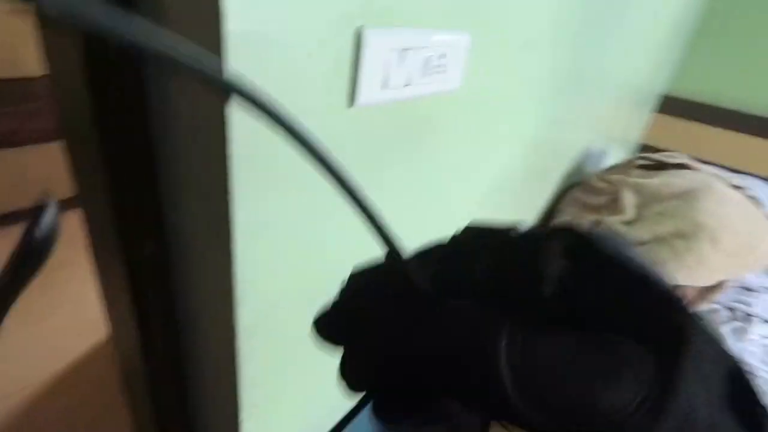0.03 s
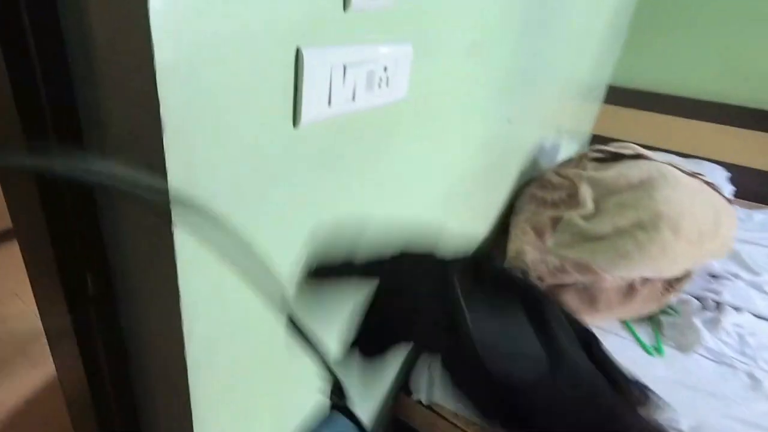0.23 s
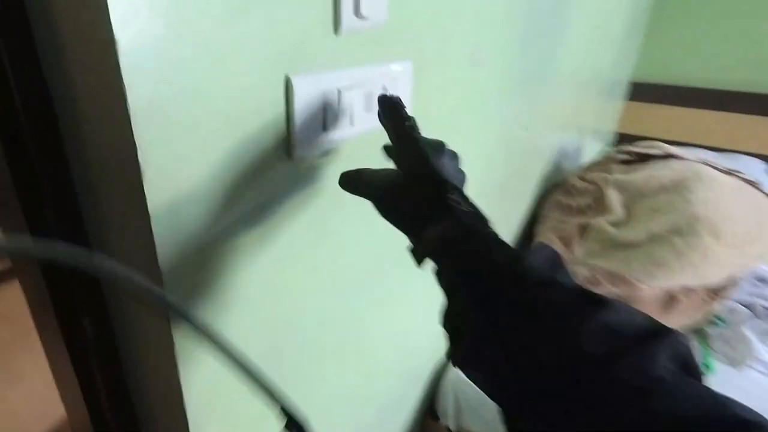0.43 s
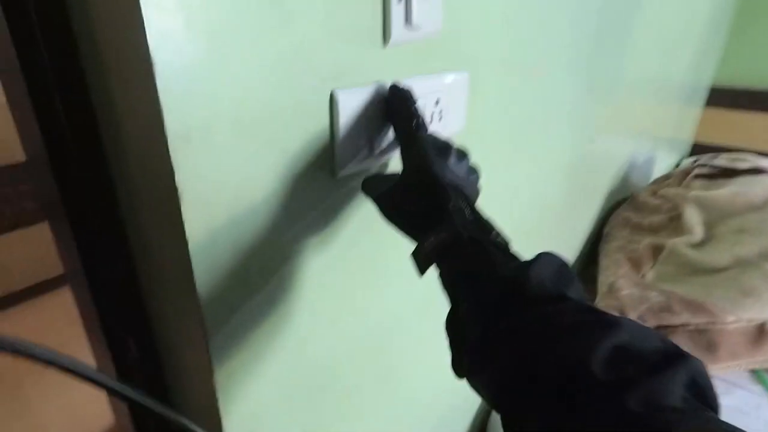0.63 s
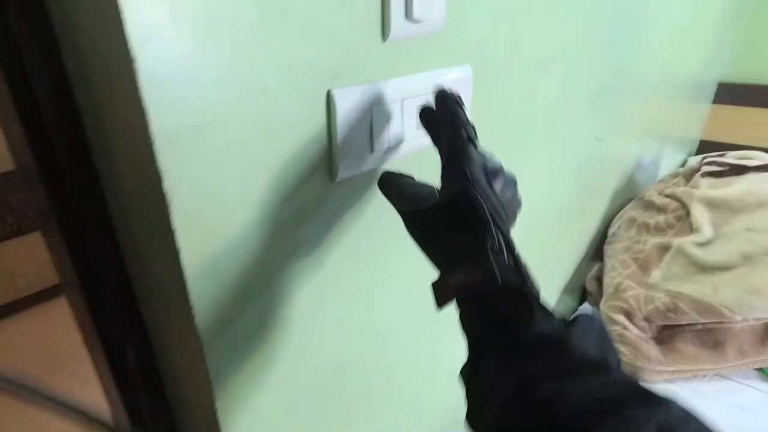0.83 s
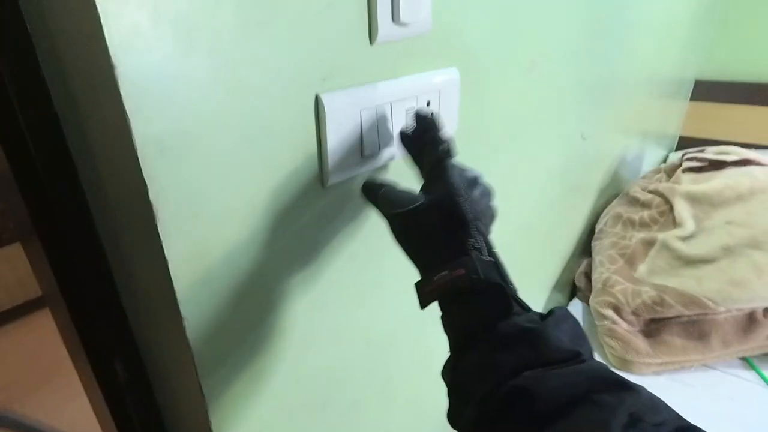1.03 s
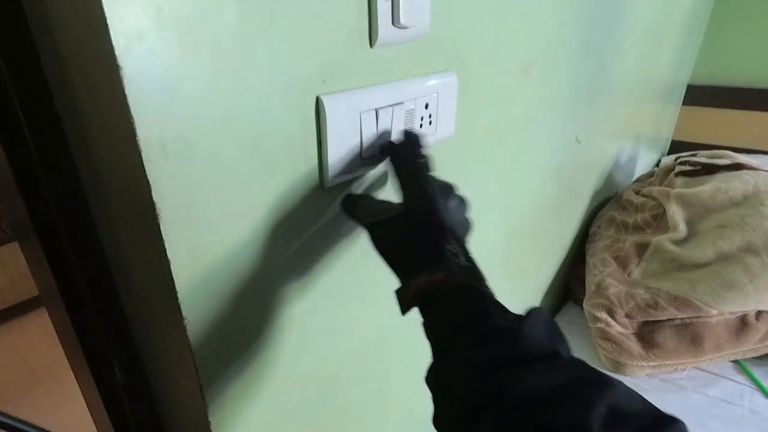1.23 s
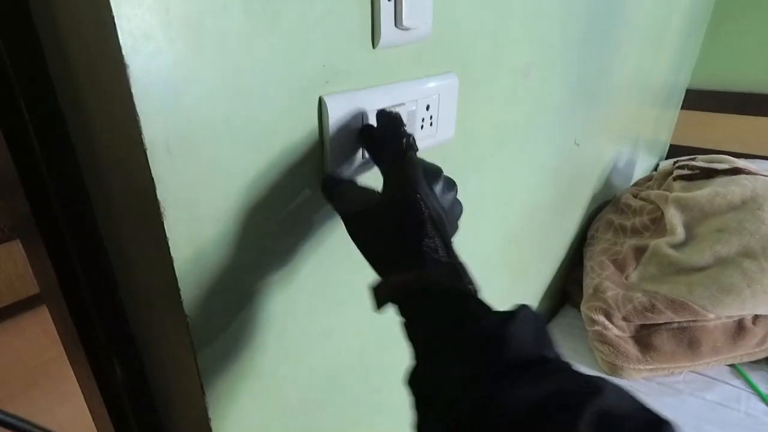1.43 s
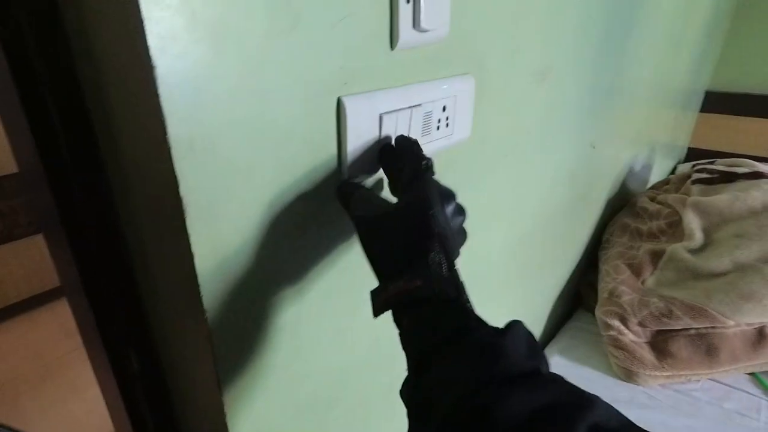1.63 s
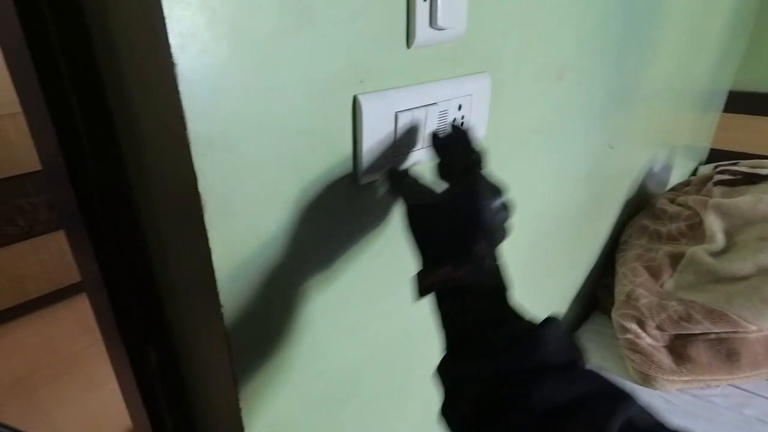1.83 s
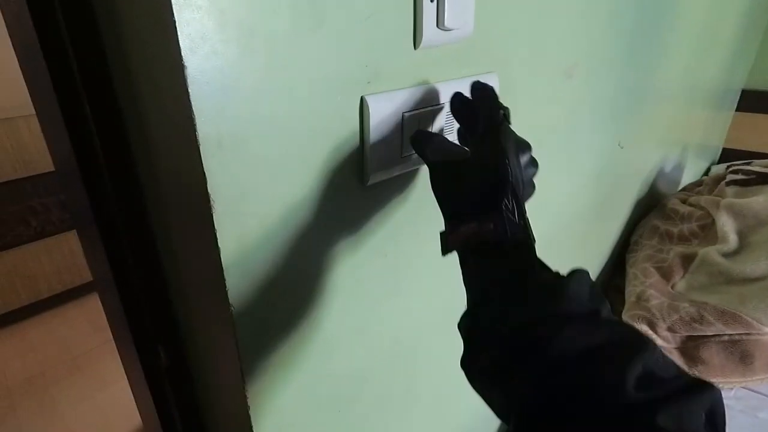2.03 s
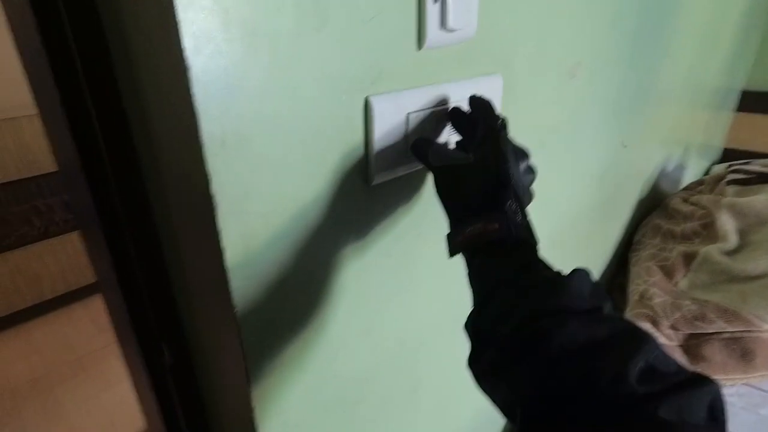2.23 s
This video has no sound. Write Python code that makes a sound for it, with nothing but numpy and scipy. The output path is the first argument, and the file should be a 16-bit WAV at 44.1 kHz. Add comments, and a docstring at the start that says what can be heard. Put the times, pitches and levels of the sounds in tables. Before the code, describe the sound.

Plastic wall switches click sharply three times, at about 0.7, 1.2 and 1.8 seconds, the second a little louder, each with a brief ring and short small-room tail. Faint sleeve rustle opens the sound and fades by 1.4 seconds. Light rubbing and soft, hollow knocks on the body-worn microphone come around 0.4, 0.6, 1.1 and 1.6 seconds, over faint steady room tone.

```python
"""Rocker switches in a hotel room

A gloved hand flicks plastic rocker switches on a wall plate three times. Each rocker snaps over,
strikes its stop and rings the plate; the small room answers briefly. The body-worn camera's microphone
picks up close sleeve rustle, and rubs and soft knocks through its hollow mount, over faint room tone."""
import sys
import numpy as np
from scipy import signal
from scipy.fft import rfft, irfft
from scipy.io import wavfile
from scipy.ndimage import uniform_filter1d

SR = 44100
rng = np.random.default_rng(int(sys.argv[2]) if len(sys.argv) > 2 else 0)


def unload_wav(signal):
    """Save mono or channel-first audio to the path in sys.argv[1] as 16-bit WAV at rate SR, clipped to [-1, 1]."""
    wavfile.write(
        sys.argv[1],
        SR,
        np.round(np.clip(np.atleast_2d(signal).T, -1, 1) * 32767).astype(np.int16),
    )


N = 100459

# flicks of the rockers: start_s, level_db, ring_build_s, bounce_delay_s, bounce_db
FLICKS = [(0.719, -23.5, 0.00088, 0.0022, -7.5), (1.2442, -20, 0.0038, .0048, 1.5),
          (1.7800, -22, 0.00094, 0.0019, -1)]
# stereo image of sounds right at the microphone: frequency_hz, left_right_likeness
CLOSE_LIKENESS = [(100, 1), (900, 0.99), (2000, 0.72), (4000, .1)]


def switches():
    """Each rocker cracks against its stop, bounces once and rings the plate; gives rings and cracks."""
    # modes of the wall plate: pitch_hz, t60_s, first_flick_db, second_flick_db, third_flick_db
    plate_modes = [(818, 0.085, -18.5, -46, -14), (1072, 0.037, -4, -19, -17),
                   (1154, 0.079, -15.5, -21, -18), (1255, 0.031, -8, -21, -11),
                   (1617, 0.016, -8, -15, -16.5), (2082, 0.027, -14, -24, -9),
                   (2355, 0.025, -12, -4.5, -18), (2673, 0.023, -7.5, -10, -12),
                   (2910, 0.021, -12, 2.5, -3), (3175, 0.034, -9, -23, -3), (3512, 0.036, -11.5, -10, -14),
                   (3750, 0.028, -20, -5, -9), (3920, 0.015, -36, -22, -18), (4830, 0.02, -4.5, -5, -19),
                   (5070, 0.032, -34, -7, -14), (5210, 0.022, -34, -10, -12),
                   (6360, 0.036, -18.5, -14, -17)]
    # the plate at the two microphone ports: frequency_hz, left_minus_right_db, left_lead_rad
    ports = [(980, 1.5, 0), (2300, -9, -1), (2600, -13, -0.3), (2840, -8, 1), (3180, -3, 0.9),
             (3440, 5, 2.5), (3700, -9, -3.5), (4770, -10.5, -4.5), (6240, 0, -3.5)]
    # spectrum of a dry contact: frequency_hz, level_db
    crack_colour = [(200, -18), (800, -8), (1500, 2), (3300, 8), (4400, -3.5), (5300, -6), (6000, -15),
                    (7600, -13), (9500, -18), (15000, -13)]
    crack_db, crack_t60_s, crack_rise_s = -10.5, 0.029, 0.000092
    low_build_s, low_below_hz = 0.0015, 1400  # the low modes swell more slowly
    rings, cracks = np.zeros((2, N)), np.zeros((2, N))
    t = np.arange(SR // 8) / SR
    side = np.array([[.5], [-.5]])
    for flick, (start_s, flick_db, build_s, bounce_s, bounce_db) in enumerate(FLICKS):
        for k, (hz, t60, *mode_db) in enumerate(plate_modes):
            swell = 1 - np.exp(-t / (build_s + low_build_s * (hz < low_below_hz)))
            wave = (-1) ** k * np.sin(2 * np.pi * hz * t + side * at_hz(ports, hz, column=2))
            gain = amp(flick_db + mode_db[flick] + side * at_hz(ports, hz))
            add(rings, start_s, gain * swell * fade(t, t60) * wave)
        for delay_s, contact_db in [(0, 0), (bounce_s, bounce_db)]:
            burst = noise(crack_colour, likeness=[(1, 0.68)], size=len(t))
            crack = burst * fade(t, crack_t60_s) * (1 - np.exp(-t / crack_rise_s))
            add(cracks, start_s + delay_s, amp(flick_db + contact_db + crack_db) * crack)
    return rings, cracks


def room_reflections(rings, cracks):
    """Each flick scatters into a short tail; its low ring lingers and echoes once off the far wall."""
    # decay of the room: frequency_hz, t60_s
    decay = [(200, 0), (1000, 0.46), (3000, 0.33), (6000, 0.27), (14000, 0.46)]
    # spectrum of a flick's tail: frequency_hz, level_db
    tail_colour = [(200, -9), (800, -5), (1150, -2), (1450, -6), (2050, -6), (2400, 3), (3000, 1.5),
                   (3800, 0), (4300, -14), (5100, -3), (6000, -15.5), (12000, -29)]
    # stereo image of the tail: frequency_hz, left_right_likeness
    tail_likeness = [(100, 0.53), (1100, 0.99), (2400, 0.56), (5000, 0.13), (15000, 0)]
    tail_delay_s, tail_db, linger_db = .007, -24, -5
    echo_delay_s, echo_db, low_ring_top_hz = .039, -7.5, 1200

    def tail(colour):
        hz, t, bands = signal.stft(noise(colour, tail_likeness, size=SR // 2), SR, nperseg=256)
        return signal.istft(bands * fade(t, at_hz(decay, hz)[:, None]), SR, nperseg=256)[1]

    out = np.zeros((2, N))
    for start_s, flick_db, *_ in FLICKS:
        add(out, start_s + tail_delay_s, amp(flick_db + tail_db) * tail(tail_colour))
    low_ring = signal.lfilter(*signal.butter(4, low_ring_top_hz, fs=SR), rings + cracks)
    walls = tail(colour=[(1, 0)])
    lingering = signal.fftconvolve(low_ring, walls / np.linalg.norm(walls[0]), axes=1)
    add(out, tail_delay_s, amp(linger_db) * lingering)
    add(out, echo_delay_s, amp(echo_db) * low_ring)
    return out


def camera_mount():
    """Rubs and soft knocks reach the microphone through the hollow mount; a firm knock damps its ring."""
    # low modes of the mount: pitch_hz, t60_s, level_db
    low_modes = [(126.3, 0.11, -9), (236.8, 0.056, 2.5), (291.2, 0.039, -1.5), (441, 0.051, -6)]
    # upper modes of the mount: pitch_hz, t60_s, level_db
    upper_modes = [(717, 0.024, 4.5), (849.3, 0.041, 4.5), (1101, 0.037, 0), (1435, 0.025, -4.5)]
    # rubbing on the mount: time_s, low_modes_db, upper_modes_db
    rubbing = [(0, -42, -43), (.07, -46, -55.5), (.2, -54.5, -58), (.27, -52, -58.5), (.34, -52.5, -60),
               (.39, -42, -59.5), (.47, -54, -60.5), (.52, -45.5, -48.5), (.62, -40, -53.5),
               (.71, -42, -58), (.8, -53.5, -61), (.88, -46.5, -56.5), (1.07, -49, -58), (1.12, -49, -48),
               (1.18, -48.5, -57.5), (1.24, -51.5, -57.5), (1.32, -51.5, -58), (1.38, -67, -59),
               (1.58, -63.5, -71), (1.62, -49.5, -54), (1.7, -51.5, -58.5), (1.76, -60, -58.5),
               (2.28, -77, -66)]
    # knocks on the mount: start_s, low_modes_db, upper_modes_db, share_of_free_t60
    knocks = [(.369, -38, -64, 0.7), (.511, -51, -49, 1), (0.5981, -32.5, -62, 0.87),
              (.622, -32, -33.5, 0.73), (0.6762, -37, -71, 1), (1.117, -36.5, -43, 0.72),
              (1.126, -41, -37, 1), (1.6255, -43, -40, .4), (1.6345, -33.5, -35.5, 0.7),
              (1.6382, -41, -50, 0.82)]
    rise_s, low_cut_hz = 0.0024, 82
    t = np.arange(SR // 4) / SR

    def ring(modes, t60_share):
        tones = sum(amp(db) * fade(t, t60 * t60_share) * np.sin(2 * np.pi * hz * t)
                    for hz, t60, db in modes)
        return tones[None] * (1 - np.exp(-t / rise_s))

    out = np.zeros((2, N))
    for column, modes in enumerate([low_modes, upper_modes], 1):
        friction = noise([(1, 0)], CLOSE_LIKENESS) * grain(depth_db=1, length_s=.012)
        rub = signal.fftconvolve(friction, ring(modes, t60_share=0.96), axes=1)[:, :N]
        out += unit(rub) * envelope(rubbing, column)
        for knock in knocks:
            add(out, knock[0], amp(knock[column]) * ring(modes, t60_share=knock[3]))
    return signal.lfilter(*signal.butter(2, low_cut_hz, "high", fs=SR), out)


def body_sway():
    """The wearer's movement puts a low rumble on the microphone."""
    # sway of the body: time_s, level_db
    sway = [(0, -69), (.11, -62), (.19, -67), (.33, -74), (.37, -44), (.44, -52), (.52, -60), (.6, -61),
            (.75, -63), (1.05, -60), (1.3, -71), (1.40, -65), (1.8, -70), (2.28, -72)]
    # spectrum of the rumble: frequency_hz, level_db
    rumble_colour = [(15, -39), (33, -14), (48, -0.5), (62, -12.5), (90, -13.5), (150, -8.5), (400, -62)]
    return noise(rumble_colour, CLOSE_LIKENESS) * envelope(sway)


def sleeve_rustle():
    """Cloth catches and slips close to the microphone."""
    # movement of the sleeve: time_s, level_db
    movement = [(0, -48), (.1, -56.5), (.2, -55), (.35, -56.5), (.5, -59.5), (.62, -56), (.9, -60.5),
                (1.4, -72), (2.28, -92)]
    # spectrum of the cloth: frequency_hz, level_db
    cloth_colour = [(400, -3), (1000, 2), (1400, -1.5), (1700, -12), (1950, -4), (2200, -11), (2600, -6.5),
                    (3400, -6.5), (4300, -15), (8000, -29), (16000, -35)]
    return noise(cloth_colour, CLOSE_LIKENESS) * envelope(movement) * grain(depth_db=1.5, length_s=0.014)


def room_tone():
    """Faint, steady room noise and microphone hiss."""
    # spectrum of the noise floor: frequency_hz, level_db
    floor_colour = [(20, -21), (130, -16.5), (170, -3.5), (260, -4), (330, -3.5), (560, -8.5), (740, -6),
                    (850, -5), (950, -8.5), (1130, -12), (1500, -10.5), (2050, -16), (3000, -13),
                    (4300, -17), (8600, -21), (9600, -17), (10600, -21.5), (13200, -22.5), (14200, -19.5),
                    (15200, -25), (15700, -66)]
    # its stereo image: frequency_hz, left_right_likeness
    floor_likeness = [(60, 0.45), (400, 0.68), (950, 0.87), (2400, 0.13), (6000, 0), (15000, 0.087)]
    return amp(-54.5) * noise(floor_colour, floor_likeness)


def amp(db):
    """Decibels to gain."""
    return 10 ** (np.asarray(db) / 20)


def unit(x):
    """Scales to rms 1."""
    return x / np.sqrt(np.mean(x ** 2) + 1e-20)


def at_hz(points, hz, column=1):
    """Reads one column of a table on a log-frequency axis."""
    columns = np.transpose(points)
    return np.interp(np.log(hz + 1), np.log(columns[0] + 1), columns[column])


def envelope(points, column=1):
    """Gain over time from a dB curve."""
    columns = np.transpose(points)
    return amp(np.interp(np.arange(N) / SR, columns[0], columns[column]))


def add(mix, start_s, sound):
    """Mixes a sound into both channels from start_s on."""
    part = mix[:, max(round(start_s * SR), 0):][:, :sound.shape[1]]
    part += sound[:, :part.shape[1]]


def noise(colour, likeness, size=N):
    """Stereo noise of rms 1 with a spectrum and a left-right likeness; a one-point curve is flat."""
    hz = np.fft.rfftfreq(size, 1 / SR)
    left, independent = rfft(rng.standard_normal((2, size)))
    shared = np.clip(at_hz(likeness, hz), -1, 1)
    right = shared * left + np.sqrt(1 - shared ** 2) * independent
    return unit(irfft(np.array([left, right]) * amp(at_hz(colour, hz)), size))


def fade(t, t60):
    """Exponential decay, 60 dB in t60 seconds."""
    return np.exp(-np.log(1000) * t / np.maximum(t60, 1e-3))


def grain(depth_db, length_s):
    """Random catching and slipping of a rubbed surface, as a gain."""
    roughness = uniform_filter1d(rng.standard_normal(N), max(int(length_s * SR), 2))
    return unit(amp(depth_db * unit(roughness)))


def scene():
    """Switches within arm's reach, the room around them, handling noise and room tone."""
    rings, cracks = switches()
    handling = camera_mount() + body_sway() + sleeve_rustle()
    return rings + cracks + room_reflections(rings, cracks) + handling + room_tone()


def record(dry):
    """The camera rounds off the sharpest peaks and cuts the highest treble."""
    overload_db, top_hz = -19.5, 15700
    rounded = amp(overload_db) * np.tanh(dry / amp(overload_db))
    lowpass = signal.firwin(401, top_hz, window=("kaiser", 9), fs=SR)
    return signal.oaconvolve(rounded, lowpass[None], "same")


dry = scene()
out = record(dry)
unload_wav(out)
```